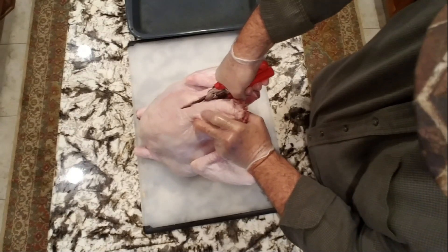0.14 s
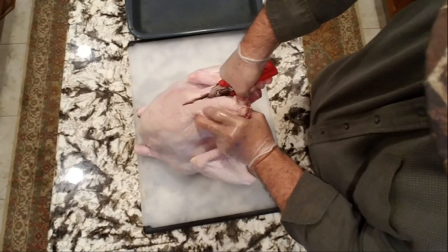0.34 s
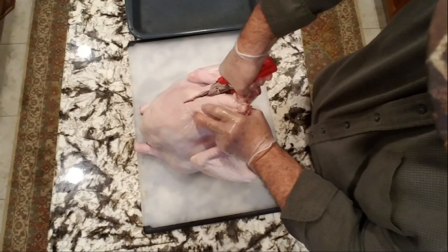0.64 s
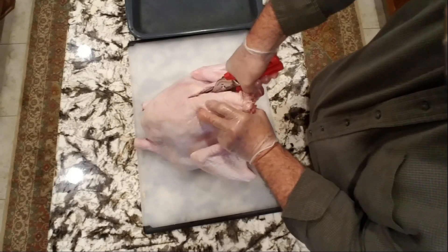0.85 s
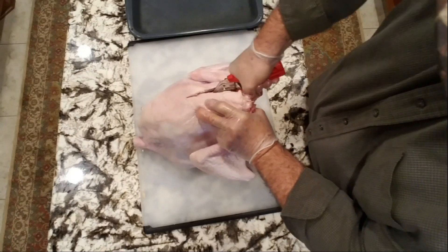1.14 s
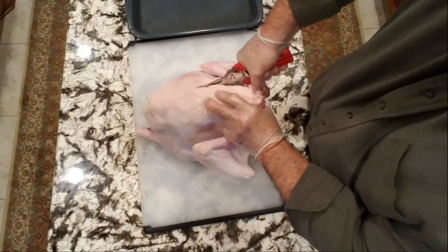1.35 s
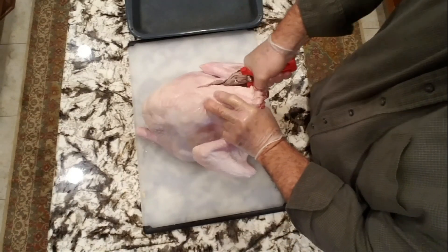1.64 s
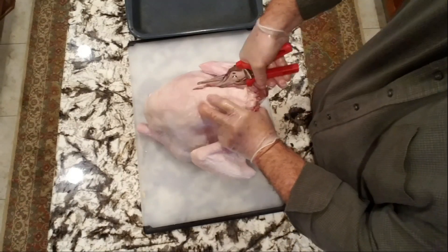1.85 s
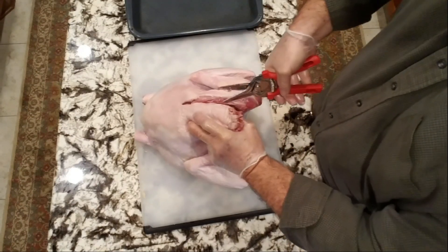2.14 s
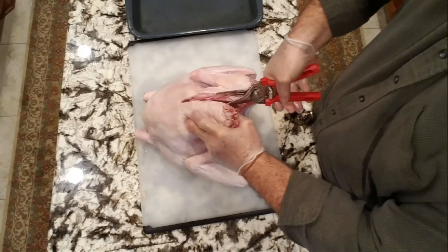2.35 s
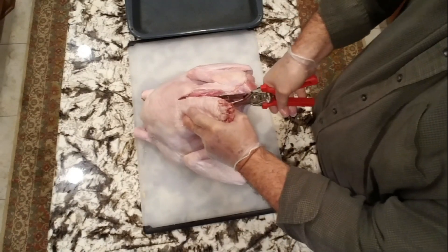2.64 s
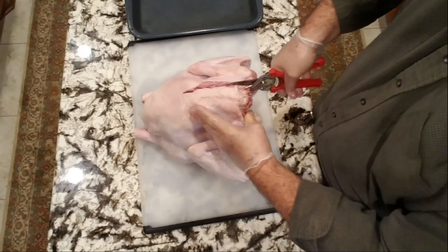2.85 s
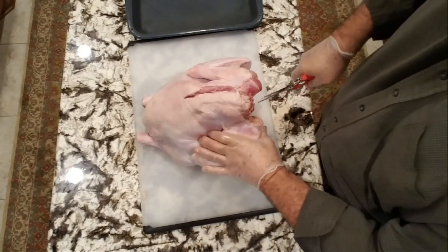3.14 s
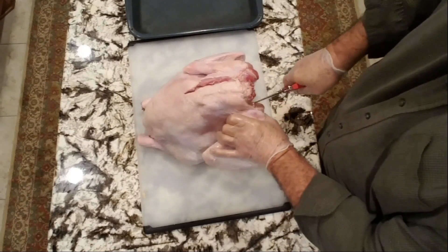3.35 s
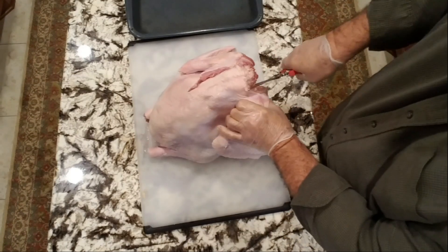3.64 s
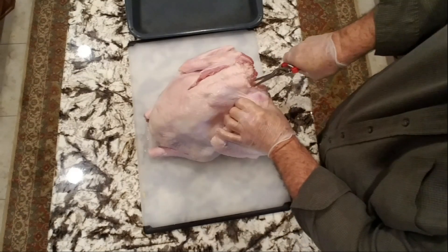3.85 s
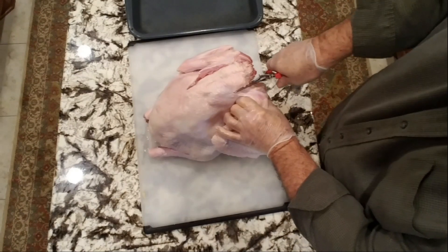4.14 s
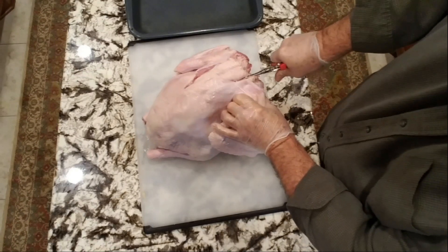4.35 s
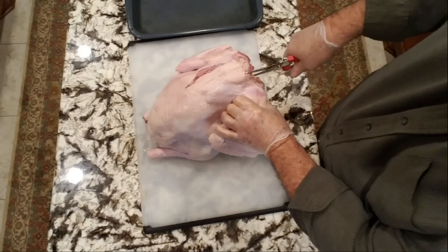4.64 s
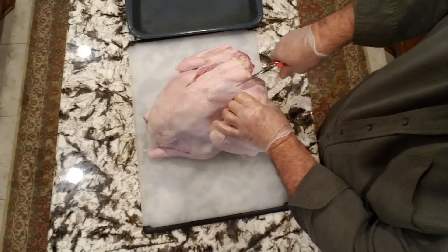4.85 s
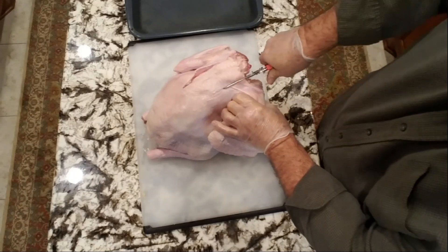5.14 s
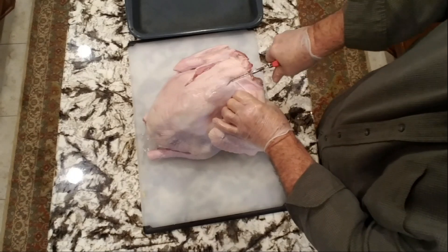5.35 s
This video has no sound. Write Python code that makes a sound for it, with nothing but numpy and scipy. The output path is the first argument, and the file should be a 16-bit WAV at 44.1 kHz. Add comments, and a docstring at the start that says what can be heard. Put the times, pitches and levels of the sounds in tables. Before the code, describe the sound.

A close stereo microphone catches shears cutting a raw turkey on a board in a hard-walled kitchen. A wet, hollow crunch opens, with crisp snaps at 0.1 s and a duller, thuddy crack near 0.6 s. A light metallic tick at 0.8 s leads to the loudest early event, a double splintering crunch at about 1.05 s with hollow knocks and a wet tearing trail. A smaller snap follows at 1.25 s, soft muffled knocks around 1.5 s and a firm dull knock at 1.8 s. From 2 to 4 s there are mostly faint ticks and soft fizzing, squelching rubs on wet skin. A knocking crack comes at 4.2 s, small ticks after it, then a strong hollow crunch at 5.1 s, fading into wet rubbing and tiny clicks until 5.5 s. Short bright reverberation follows each crack. Quiet air and a low appliance hum, swelling towards 4.3 s, sit underneath.

```python
"""Cutting the backbone from a raw turkey

Poultry shears cut a raw turkey on a board, close to a stereo microphone in a hard-walled kitchen.
Each bone that gives way is a noise burst that cracks, knocks and rings the hollow carcass as dying sines.
Hands rub on wet skin between cuts: random clicks, shaped into fizz, scrape and squelch.
Behind it, filtered noise makes the room air, and wavering tones make the hum of an appliance."""
import sys
import numpy as np
from scipy import signal
from scipy.fft import rfft, irfft
from scipy.io import wavfile
from scipy.ndimage import uniform_filter1d

SR = 44100
rng = np.random.default_rng(int(sys.argv[2]) if len(sys.argv) > 2 else 0)


def inscribe(sig):
    """Save sig as 16-bit PCM at rate SR to the path in sys.argv[1].

    A 1-D sig is mono; a 2-D sig holds one channel per row.
    Samples are clipped to [-1, 1] before scaling.
    """
    pcm = np.round(np.clip(np.atleast_2d(sig).T, -1, 1) * 32767)
    wavfile.write(sys.argv[1], SR, pcm.astype(np.int16))


N = 242575

# resonances of the hollow carcass: (frequency [Hz], relative level [dB], time to fall 60 dB [s])
CARCASS_MODES = [(403, -5, 0.032), (453, 5.5, 0.035), (481, 1.5, 0.041), (590, -12.5, 0.054)]


def gain_of(db):
    """Turns decibels into an amplitude factor."""
    return 10 ** (np.asarray(db) / 20)


def evened(x):
    """Scales a sound to an overall RMS of 1."""
    return x / np.sqrt(np.mean(x ** 2) + 1e-20)


def early(x):
    """Scales a sound to an RMS of 1 over its first 20 ms."""
    return x / np.sqrt(np.mean(x[:SR // 50] ** 2))


def read(points, hz):
    """Reads a table of (frequency, value) along a logarithmic frequency axis."""
    f, value = np.transpose(points)
    return np.interp(np.log(hz + 1), np.log(f + 1), value)


def add(mix, s, sound):
    """Lays a sound into the mix from s seconds on."""
    part = mix[round(s * SR):][:len(sound)]
    part += sound[:len(part)]


def band(x, lo_hz, hi_hz):
    """Keeps the band between two frequencies."""
    return signal.sosfilt(signal.butter(4, [lo_hz, min(hi_hz, SR / 2.1)], "band", fs=SR, output="sos"), x)


def ring(modes, t, rise_s):
    """Resonances struck together: dying sines with a soft start."""
    sines = sum(gain_of(db - 60 * t / t60) * np.sin(2 * np.pi * hz * t) for hz, db, t60 in modes)
    return (1 - np.exp(-t / rise_s)) * sines


def air():
    """Room air noise, most alike left and right in the deep bass, with faint drifting patches."""
    # noise spectrum: (frequency [Hz], relative level [dB per Hz])
    spectrum = [(18, -24), (30, 12), (43, -16), (98, -4), (174, -12.5), (239, -9.5), (336, -10),
                (393, -11.5), (664, -14.5), (777, -15), (934, -19.5), (1750, -19), (7430, -36.5),
                (14700, -29), (15900, -25.5)]
    # correlation of the two channels: (frequency [Hz], left-right likeness [-1 to 1])
    likeness = [(60, 0.87), (180, 0.3), (550, 0.38), (1650, -0.21), (4970, 0.26), (15000, -0.27)]
    level_db = -62.5
    frames, hz = N // 512 + 5, np.fft.rfftfreq(2048, 1 / SR)
    a, b, c, d, patches = rng.standard_normal((frames, 1025, 5)).T
    patches = evened(uniform_filter1d(uniform_filter1d(patches, 24, 0), 8, 1))
    same = np.clip(read(likeness, hz), -1, 1)[:, None]
    left = a + 1j * b
    right = same * left + np.sqrt(1 - same ** 2) * (c + 1j * d)
    z = np.array([left, right]) * gain_of(read(spectrum, hz)[:, None] + 0.5 * patches)
    return gain_of(level_db) * evened(signal.istft(z, nperseg=2048, noverlap=1536)[1][:, :N])


def waver(hz, width_hz, steady):
    """A tone whose strength and phase wander within its width; more steady share means less wander."""
    r = np.exp(-np.pi * width_hz / SR)
    noise = rng.standard_normal(N) + 1j * rng.standard_normal(N)
    slow = signal.lfilter([1 - r], [1, -r], noise)
    carrier = np.exp(2j * np.pi * hz * np.arange(N) / SR)
    return evened(((slow / np.std(slow) + steady) * carrier).real)


def appliance():
    """A wavering motor hum that swells slowly, and a few tones that hold their average level."""
    # swell of the hum: (time [s], level [dB])
    swell = [(0.0, -83), (1.7, -79), (2.0, -72), (3.3, -66.5), (4.3, -62.5), (4.8, -69), (5.5, -66.5)]
    # the other tones: (frequency [Hz], width [Hz], level [dB])
    tones = [(54.2, 26, -74), (252, 9.6, -75), (779, 3, -78.5)]
    s, db = np.transpose(swell)
    out = gain_of(np.interp(np.arange(N) / SR, s, db)) * waver(93.4, 2.6, steady=4.2)
    for hz, width_hz, tone_db in tones:
        out += gain_of(tone_db) * waver(hz, width_hz, steady=2.2)
    return out


def grains(per_s, spread_db):
    """Clicks at random moments, a few much larger than the rest."""
    size = gain_of(spread_db * np.minimum(rng.exponential(1, N), 4))
    return rng.standard_normal(N) * size * (rng.random(N) < per_s / SR)


def rubbing():
    """Wet skin unsticks in uneven grains: a bright fizz, coarser pops in the flesh, a squelch in the cavity."""
    # hands and blades rubbing on wet skin, and flesh tearing after a cut:
    # (time of full strength [s], rise [s], hold [s], fall [s], fizz level [dB],
    #  scrape relative to fizz [dB], squelch relative to fizz [dB])
    strokes = [(.008, 0.024, 0.03, 0.016, -52, -9.5, 3.5), (0.443, .04, 0.0042, 0.026, -77, 10.5, 8),
               (0.472, 0.019, .005, 0.098, -59.5, -9.5, -4), (0.552, 0.035, .005, 0.012, -74.5, 2, 21),
               (0.716, 0.0065, 0.0055, 0.031, -67, -3, -1), (0.757, 0.028, 0.0054, .04, -68, 0, -6),
               (0.85, 0.011, 0.12, 0.22, -66.5, -6.5, -5), (0.988, .015, 0.0029, 0.0073, -55.5, 5.5, -10),
               (1.056, 0.0035, .004, 0.26, -51, -6.5, 9), (1.27, 0.0051, 0.0034, 0.13, -56.5, -8, -6),
               (1.317, 0.011, 0.0055, 0.43, -62, -3.5, 0.5), (1.508, .07, 0.012, .1, -67.5, 3.5, 0),
               (1.755, 0.073, 0.017, .03, -63.5, 1, -1), (1.805, 0.082, 0.012, .006, -55, -16, -23),
               (1.88, .006, .005, 0.23, -60.5, -0.5, 2), (1.982, 0.0053, .005, 0.15, -64.5, -3, -3),
               (2.201, 0.035, 0.016, 0.047, -83, 12.5, 16), (2.262, 0.12, .005, 0.053, -66, 0, -5),
               (2.337, .008, 0.0037, 0.061, -52.5, -11.5, -11),
               (2.714, 0.11, 0.0042, 0.016, -60, -4, -17.5), (2.721, 0.022, .1, 0.36, -65.5, -3, -4.5),
               (2.941, 0.15, 0.0055, 0.31, -66, -19, -1), (3.132, .04, .005, 0.32, -66.5, -2.5, -0.5),
               (3.298, 0.056, 0.009, 0.024, -82.5, 7.5, 19), (3.398, .02, 0.0082, 0.13, -95, 24, 17),
               (3.523, 0.16, 0.0041, 0.11, -77.5, 3.5, 7), (3.765, .05, .005, 0.13, -69.5, 1, -6),
               (4.084, 0.096, .005, .14, -68.5, -0.5, -6), (4.17, 0.093, .006, .006, -65, -6, -22),
               (4.236, .006, 0.0045, 0.11, -43.5, -2.5, -14), (4.408, 0.35, .01, .01, -70, 2, 9),
               (4.46, .008, 0.063, .03, -66, -9, -3), (4.507, 0.034, 0.0038, 0.1, -60.5, 1, -3),
               (4.791, .006, 0.0046, 0.098, -61.5, -4.5, -5), (4.89, 0.026, 0.0066, 0.23, -54, -3.5, -4.5),
               (5.042, 0.047, .005, 0.023, -58, -4, -2), (5.107, 0.0066, 0.0035, .13, -37.5, -3.5, -7.5),
               (5.193, .04, 0.018, 0.37, -65, -3, 4), (5.366, .006, 0.015, 0.09, -62, -0.5, -7)]
    # spectrum of the fizz: (frequency [Hz], relative level [dB per Hz])
    fizz_spectrum = [(1940, -32), (3300, -5), (4960, 0.5), (8850, -3), (9580, -2.5), (11800, 1.5),
                     (15900, -1.5)]
    # small wet pockets, each popping on its own: frequency [Hz]
    pops_hz = [1108, 1559, 1900, 2210, 3090]
    depth_db = -35.5  # how far a stroke lies below full strength at the ends of its rise and fall

    fine = grains(3000, 2.1)
    fizz = evened(irfft(rfft(fine) * gain_of(read(fizz_spectrum, np.fft.rfftfreq(N, 1 / SR))), N))
    scrape = evened(sum(band(grains(500, 4.2), hz / 1.15, hz * 1.144) for hz in pops_hz))
    wet = band(grains(900, 4.3), 226, 720)
    cavity = ring(CARCASS_MODES, np.arange(4096) / SR, 0.0095)
    hollow = signal.oaconvolve(wet, cavity)[:N]
    squelch = evened(evened(wet) + 0.9 * evened(hollow))

    out, t = np.zeros(N), np.arange(N) / SR
    for s, rise, hold, fall, fizz_db, scrape_db, squelch_db in strokes:
        away = np.maximum(np.maximum((s - t) / rise, (t - s - hold) / fall), 0)  # 0 at full strength
        strength = gain_of(fizz_db + depth_db * np.minimum(away, 10))
        out += strength * (fizz + gain_of(scrape_db) * scrape + gain_of(squelch_db) * squelch)
    return out


def splinter(t, t60):
    """Many tiny fractures at once favour no pitch: dying noise with an even spectrum."""
    shape = gain_of(-60 * t / t60) * (t / (t + 0.00047)) ** 2  # the fracture grows, then stops
    burst = rng.standard_normal(len(t))
    for _ in range(3):  # shape in time, then even out the spectrum
        z = rfft(burst * shape)
        burst = irfft(z / (abs(z) + 1e-9), len(t))
    return burst * np.sqrt(shape)


def crack(crack_db, snap_db, knock_db, knock_hz, cavity_db, thud_db, t60):
    """A splintering burst and a short knock of the bone ring cavity, bulk and board; no snap_db: a dull blow."""
    # board on the counter: (frequency [Hz], relative level before the band filter [dB], time to fall 60 dB [s])
    board_modes = [(67, 4, 0.064), (100, -5.5, 0.11), (147.8, 4.5, 0.039)]
    # the bird's bulk: (frequency [Hz], relative level [dB], time to fall 60 dB [s])
    bulk_modes = [(289.7, 0, 0.11)]
    # steel damped by flesh: (frequency [Hz], level relative to the crack or snap around it [dB])
    blade_modes = [(4500, -14), (5500, -12.5), (8200, -16), (12200, -15)]
    t = np.arange(SR // 4) / SR
    burst = splinter(t, t60)
    bone = early(band(burst, 750, 2744)) + 0.73 * early(band(burst, knock_hz * 0.85, knock_hz * 1.192))
    bone += 0.43 * early(band(burst, 820, 982))  # the ribs answer every blow near the same pitch
    top_hz = 3700 if snap_db is None else 8740  # flesh muffles a dull blow
    bulk_db = (cavity_db + thud_db) / 2 - 4.5  # midway between cavity and thud, this much weaker
    parts = [(thud_db, band(ring(board_modes, t, 0.00235), 69, 350)),
             (bulk_db, ring(bulk_modes, t, 0.0076)),
             (cavity_db, ring(CARCASS_MODES, t, 0.0023)),
             (knock_db, bone),
             (crack_db, band(burst, 2854, top_hz))]
    if snap_db is not None:  # a sharp crack has a bright snap, and the steel colours it
        parts.append((snap_db, band(burst, 10900, 25000)))
        for hz, db in blade_modes:
            around_db = crack_db if hz < 7000 else snap_db
            parts.append((around_db + db, band(burst, hz * 0.951, hz * 1.064)))
    return sum(gain_of(db) * early(part) for db, part in parts)


def tail():
    """Late reverberation: sparse taps of random sign, each band dying at its own speed."""
    # decay of the kitchen: (frequency [Hz], time to fall 60 dB [s])
    decay = [(100, 0.23), (400, 0.29), (1040, 0.4), (2760, 0.33), (7280, 0.3), (15000, 0.19)]
    # long waves reach both microphone ports alike: (frequency [Hz], left-right likeness [0 to 1])
    likeness = [(60, 1), (300, 0.93), (550, 0.83), (1000, 0.16), (3000, 0.11)]
    taps = np.zeros((2, SR))
    at = np.arange(120, SR - 20, 10) + rng.integers(0, 10, (2, (SR - 131) // 10))
    np.put_along_axis(taps, at, rng.choice([-1., 1.], at.shape), 1)
    spec = rfft(taps)
    same = np.clip(read(likeness, np.fft.rfftfreq(SR, 1 / SR)), 0, 1)
    spec[1] = same * spec[0] + np.sqrt(1 - same ** 2) * spec[1]
    hz, t, z = signal.stft(irfft(spec, SR), SR, nperseg=256)
    fading = z * gain_of(-60 * t / read(decay, hz)[:, None])
    out = signal.istft(fading, SR, nperseg=256)[1]
    return gain_of(-3) * out / np.linalg.norm(out[0])


def kitchen(x):
    """Direct sound, early echoes and three tails in steady turns: reverberation wide between left and right."""
    # direct sound at the two ports: (frequency [Hz], phase by which the left port leads [rad])
    port_phase = [(200, .05), (1200, 0.92), (4000, 1.79), (15000, 1.66)]
    # early echoes: (left delay [s], right delay [s], level [dB])
    echoes = [(.0035, 0.0031, -9), (.0064, 0.0064, -33.5), (.009, 0.0082, -14.5), (0.014, 0.0096, -18.5)]
    hz, first = np.fft.rfftfreq(128, 1 / SR), np.zeros((2, 1024))
    lead = read(port_phase, hz) / 2 * np.array([[1], [-1]])
    direct = irfft(np.exp(1j * (lead - 2 * np.pi * hz * 16 / SR)), 128)  # 16 samples late, room for the lead
    first[:, :128] = gain_of([[-.7], [.7]]) * direct  # the right port is slightly louder
    for left_s, right_s, db in echoes:
        first[[0, 1], [round(left_s * SR), round(right_s * SR)]] += gain_of(db)
    turn = 2 * np.pi * 7 * np.arange(N) / SR  # 7 turns per second
    paths = [(x, first)]
    for k in range(3):  # the squares of the three shares always sum to 1
        share = np.sqrt(2 / 3) * np.cos(turn + k * np.pi / 3)
        paths.append((x * share, tail()))
    return sum(signal.oaconvolve(v[None], path, axes=1)[:, :N] for v, path in paths)


def scene():
    """Rubbing, sharp cracks and dull blows sound in the kitchen, over its air and the appliance."""
    # sharp bone cracks and blade ticks: (time [s], crack level [dB], snap level [dB], knock level [dB],
    #  knock frequency [Hz], cavity level [dB], thud level [dB])
    cracks = [(0.007, -52, -46, -49.5, 1460, -41.5, -53.5), (0.113, -43.5, -34.5, -50, 2030, -42, -84),
              (0.129, -43, -45, -46.5, 1950, -47, -63), (0.575, -45.5, -44, -44.5, 860, -45, -47),
              (0.799, -48.5, -39.5, -56, 1910, -66, -78), (0.915, -84, -59.5, -80, 1990, -75, -79),
              (1.042, -36.5, -34, -31.5, 1580, -35, -66), (1.059, -31.5, -28, -33.5, 1405, -34, -42),
              (1.241, -48.5, -42, -54, 1950, -66, -62), (1.326, -63, -52.5, -64, 1640, -63, -73),
              (1.733, -73, -57, -69, 1870, -63.5, -70), (1.87, -56.5, -53, -54, 2110, -77, -55.5),
              (1.983, -72, -55, -69, 1400, -77, -70), (2.34, -66.5, -64, -72.5, 1390, -78, -72),
              (2.708, -72, -60, -64.5, 1100, -79, -68), (2.921, -75, -55.5, -86, 848, -82, -83),
              (3.125, -63.5, -65, -65, 1560, -70, -69), (4.039, -63.5, -67, -69, 2960, -77, -65.5),
              (4.084, -67.5, -53.5, -71, 1040, -62, -86), (4.184, -57, -46, -48, 1320, -46.5, -90),
              (4.215, -46, -44.5, -40.5, 1226, -37, -73), (4.507, -66, -62, -56.5, 890, -61.5, -61),
              (4.794, -67.5, -75, -74.5, 2300, -66, -71), (4.877, -80, -56, -67, 1720, -62.5, -80),
              (5.01, -79, -75, -68, 1060, -66, -66), (5.041, -64, -57, -71, 1330, -48, -78),
              (5.079, -38, -34.5, -36.5, 1404, -28.5, -74), (5.154, -43.5, -43.5, -47, 2070, -55, -64),
              (5.354, -71, -57, -81, 995, -74, -80), (5.381, -63.5, -65, -59, 900, -65, -72)]
    # dull blows inside the bird: (time [s], knock level [dB], knock frequency [Hz],
    #  cavity level [dB], thud level [dB])
    knocks = [(0.389, -77, 1360, -64, -77), (0.593, -54, 1485, -50, -54), (0.61, -54.5, 1500, -60, -61),
              (0.992, -43, 2330, -49.5, -62), (1.0, -56, 2360, -50, -53), (1.073, -38, 1830, -54, -52),
              (1.089, -58, 1750, -43.5, -44), (1.461, -64, 2100, -49.5, -72), (1.489, -63, 1950, -52, -69),
              (1.511, -50, 1590, -44, -63), (1.54, -62, 1340, -50, -78), (1.593, -74, 2190, -57, -68),
              (1.813, -34, 1900, -51.5, -55), (2.86, -68, 2060, -60, -65), (4.226, -43, 2640, -46.5, -71),
              (4.236, -47.5, 1320, -36.5, -75), (5.104, -48, 1880, -33.5, -53),
              (5.139, -50, 1970, -43, -58)]
    crack_t60_s, knock_t60_s = .0075, 0.016  # a sharp crack splinters briefly, a dull blow longer
    muffled_db = -19  # crack of a dull blow, relative to its knock
    near = rubbing()
    for s, *row in cracks:
        add(near, s, crack(*row, crack_t60_s))
    for s, knock_db, *row in knocks:
        add(near, s, crack(knock_db + muffled_db, None, knock_db, *row, knock_t60_s))
    return kitchen(near) + air() + appliance()


def record(dry):
    """The band limit of the recorder: a steep low-pass near 16 kHz."""
    low_pass = signal.firwin(255, 16050, window=("kaiser", 9), fs=SR)
    return signal.oaconvolve(dry, low_pass[None], "same")


dry = scene()
out = record(dry)
inscribe(out)
```